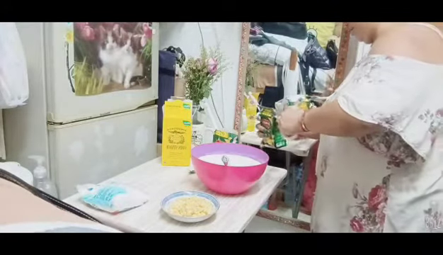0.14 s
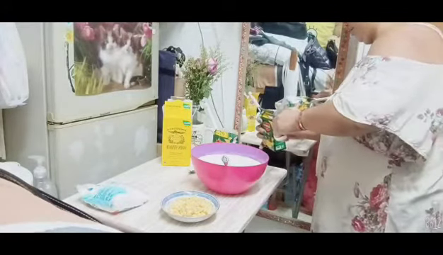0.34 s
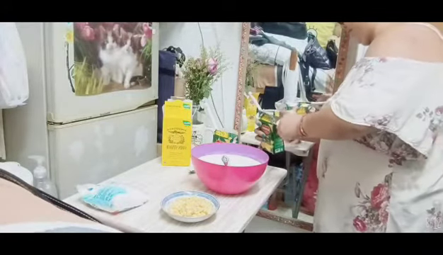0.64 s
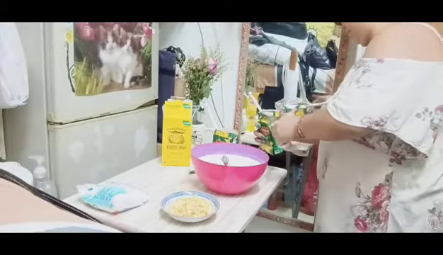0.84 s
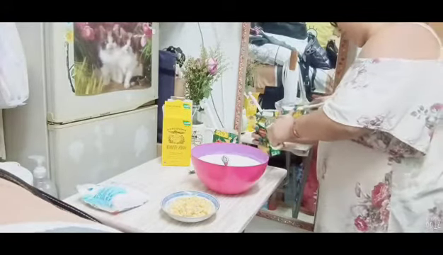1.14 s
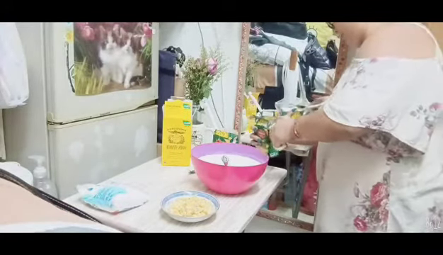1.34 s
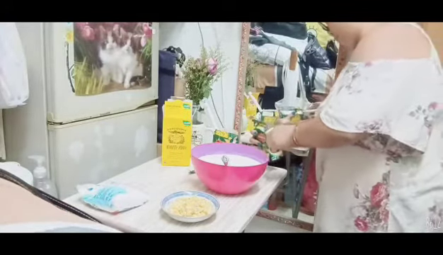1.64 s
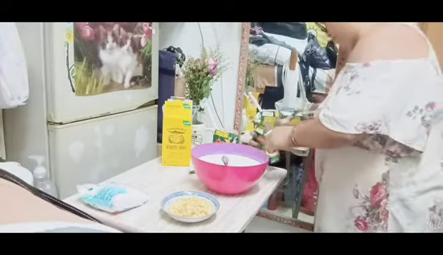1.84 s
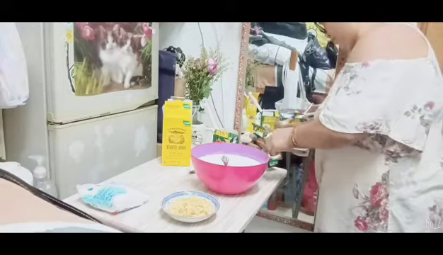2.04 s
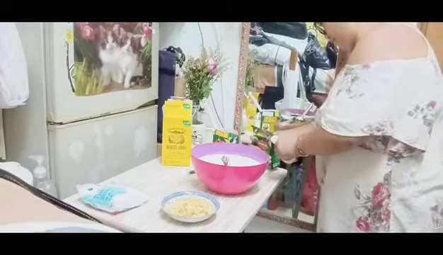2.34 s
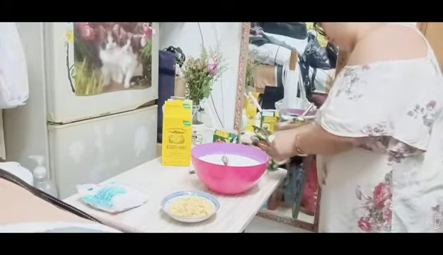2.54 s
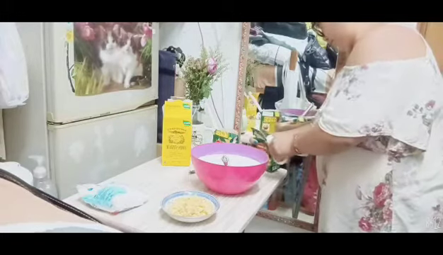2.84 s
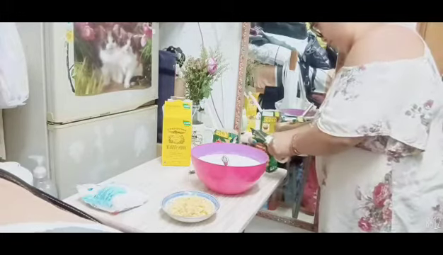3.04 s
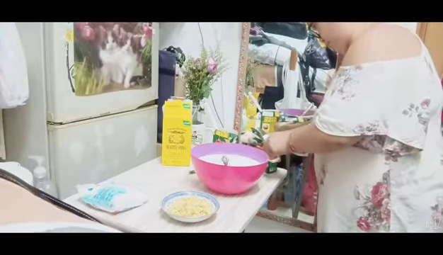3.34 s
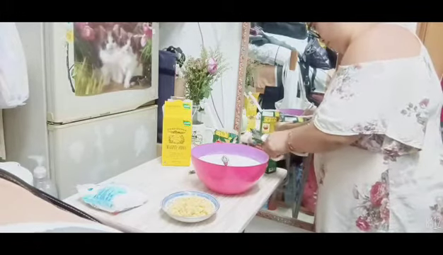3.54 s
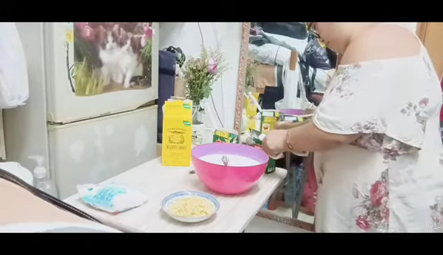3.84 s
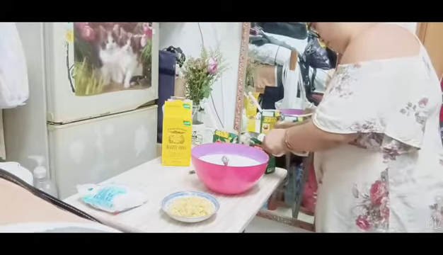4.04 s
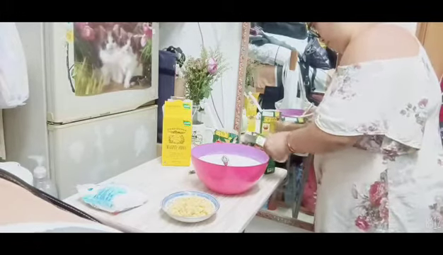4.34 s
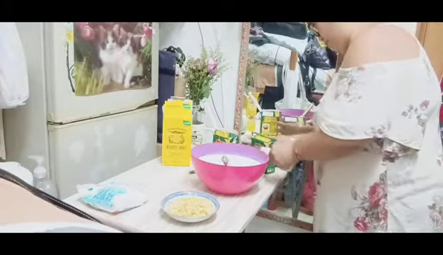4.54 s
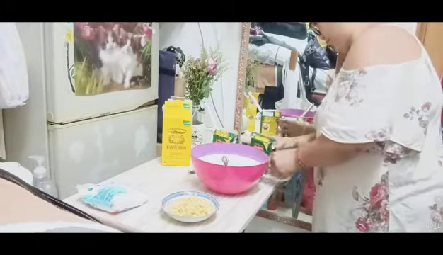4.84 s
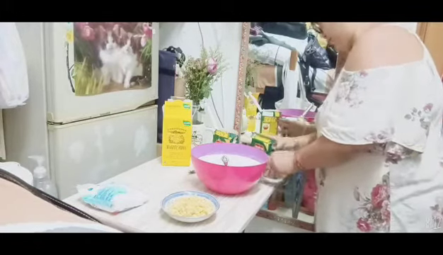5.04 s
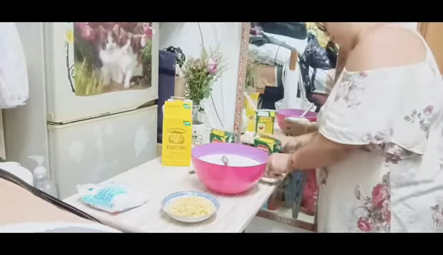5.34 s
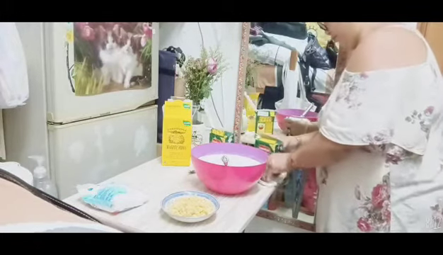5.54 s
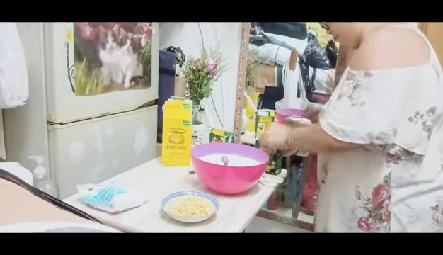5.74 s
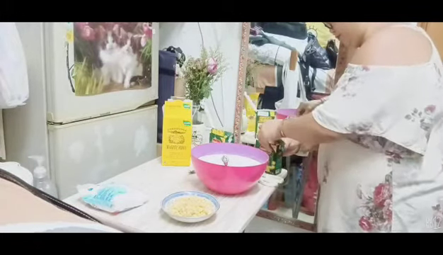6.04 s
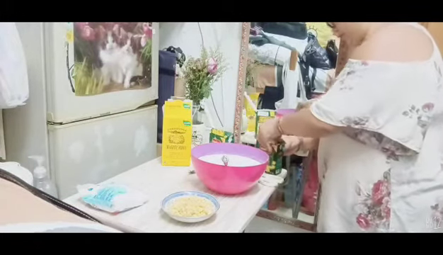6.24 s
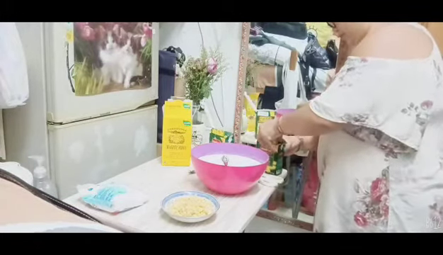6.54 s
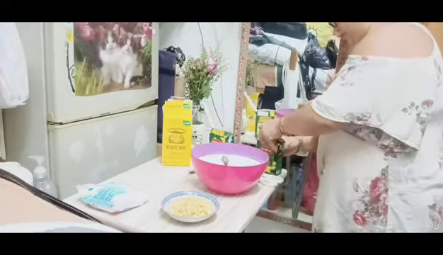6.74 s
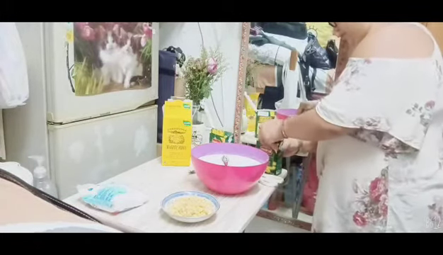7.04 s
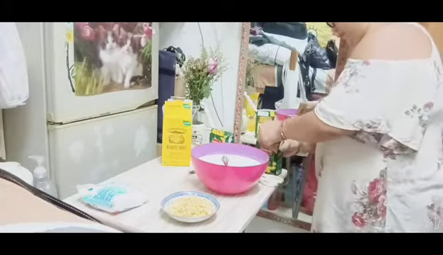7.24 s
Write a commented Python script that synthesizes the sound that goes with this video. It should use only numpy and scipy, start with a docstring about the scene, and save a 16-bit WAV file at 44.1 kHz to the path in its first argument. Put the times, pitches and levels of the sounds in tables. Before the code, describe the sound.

Thin metallic scrapes and ticks on a can rim, one hard bright snap, then tinny clunks on a tabletop, with a steady motor hum in a small kitchen.

```python
"""Two motors a few hertz apart hum and throb over room rush from the start; quiet moments are turned down.
A hand opener then works round a tin can in a small kitchen: the blade scrapes along the rim in short
strokes of filtered friction noise, ticks, squeaks once and slips. One hard snap follows near 3.9 s; the tin
and the tool, built from noise bursts and ringing modes, knock on the table, and metal slides over its top."""
import sys
import numpy as np
from scipy import signal
from scipy.fft import rfft, irfft, next_fast_len
from scipy.io import wavfile
from scipy.ndimage import map_coordinates

SR = 44100
rng = np.random.default_rng(int(sys.argv[2]) if len(sys.argv) > 2 else 0)


def materialize(psi):
    """Save the field psi as 16-bit PCM at rate SR to the path in sys.argv[1].

    A 1-D psi becomes a single channel; in a 2-D psi each row is a channel.
    """
    bounded = np.clip(np.atleast_2d(psi).T, -1, 1)
    quanta = np.round(bounded * 32767).astype(np.int16)
    wavfile.write(sys.argv[1], SR, quanta)


N = 326597


def amp(db):
    """Decibels to gain."""
    return 10 ** (np.asarray(db) / 20)


def unit(x):
    """Scale to rms 1."""
    return x / np.sqrt(np.mean(x ** 2) + 1e-20)


def onset_unit(sound):
    """Scale to rms 1 over the first 10 ms."""
    return sound / np.sqrt(np.mean(sound[:SR // 100] ** 2))


def wobble(rate_hz):
    """A smooth random curve through rate_hz random knots a second."""
    knots = rng.standard_normal(int(N * rate_hz / SR) + 4)
    return map_coordinates(knots, [np.arange(N) * rate_hz / SR])


def colour(x, shape, size=4096):
    """Pass x through a causal minimum-phase filter with the given (pitch_hz, gain_db) shape."""
    knots_hz, gain_db = np.transpose(shape)
    bins_hz = np.fft.rfftfreq(size, 1 / SR)
    log_gain = np.log(amp(np.interp(np.log(bins_hz + 1), np.log(knots_hz), gain_db)))
    # folding the cepstrum onto positive time makes the filter causal
    cepstrum = irfft(log_gain)
    cepstrum[1:size // 2] *= 2
    cepstrum[size // 2 + 1:] = 0
    impulse = irfft(np.exp(rfft(cepstrum)))
    return signal.fftconvolve(x, impulse)[:len(x)]


def add(track, start_s, sound):
    """Mix a sound into the track at its start time."""
    part = track[round(start_s * SR):]
    part[:len(sound)] += sound[:len(part)]


# motor lines, before the shared lift and wobble: pitch_hz [Hz], level_db [dB]
HUM = [(48.02, -68), (100, -65), (144.07, -53.5), (147.95, -57.3), (192.09, -65.5), (196.1, -77)]
# slow rise and fall of the background: time_s [s], gain_db [dB]
SWELL = [(0, 0), (0.8, 1.5), (0.9, -1), (1.9, -1), (2.15, 1.5), (2.87, 3.5), (2.96, -3.5), (3.28, -1.7),
         (3.45, 2.5), (4.13, 1.7), (4.26, -1), (4.7, -2.2), (4.85, 2), (5.93, 1), (6.08, -3.5), (6.8, -4),
         (7.08, 1), (7.41, -1.5)]
# relative colour of the room's low rush: pitch_hz [Hz], gain_db [dB]
AIR = [(25, -26), (45, -6), (65, -5.5), (100, 5), (125, -0.5), (140, 14.5), (175, 1.5), (230, 2), (420, 4),
       (520, -6.5), (850, -12), (1050, -17.5), (1800, -27.5)]
# relative colour of its high fizz: pitch_hz [Hz], gain_db [dB]
FIZZ = [(700, -17.5), (1700, 0), (2300, 4.5), (3100, -9), (3900, -7), (4500, -10.5), (5100, -5),
        (5700, -16), (7200, -6.5), (8600, 2.5), (10000, -4), (11500, -19.5), (15500, -21.5)]
IN_STEP_S = .75  # a moment when the two motors are in step


def background():
    """Two motors drift in and out of step over the rush of the room; the level slowly rises and falls."""
    t = np.arange(N) / SR
    swell_db = np.interp(t, *np.transpose(SWELL))
    t = t - IN_STEP_S
    motors = sum(amp(level_db) * np.cos(2 * np.pi * hz * t) for hz, level_db in HUM)
    hum = amp(1.85 + .3 * wobble(10)) * motors
    air = amp(-59.0) * unit(colour(rng.standard_normal(N), AIR))
    fizz = amp(-68.5 + .5 * wobble(14)) * unit(colour(rng.standard_normal(N), FIZZ))
    # two faint, wavering whines ride on the rush; the higher one does not follow the swell
    whine = amp(-76.5 + 2 * wobble(7)) * np.sin(2 * np.pi * 865 * t + 1.1 * wobble(25))
    sing = amp(-83 + wobble(3)) * np.sin(2 * np.pi * 4420 * t + 2 * wobble(260))
    return amp(swell_db) * (hum + air + fizz + whine) + sing


BITE_S = 0.0075  # time constant of every onset of a push


def push(start_s, length_s, grows_db, release_db_per_s):
    """Gain of one push of the hand: it bites, changes by grows_db toward a gain of 1, then lets go."""
    t = np.maximum(np.arange(N) / SR - start_s, 0)
    pressure_db = grows_db * (np.minimum(t / length_s, 1) - 1)
    release_db = release_db_per_s * np.maximum(t - length_s, 0)
    return (1 - np.exp(-t / BITE_S)) * amp(pressure_db - release_db)


def slips(rate_hz, spread_db, smooth):
    """Strength of friction, rms 1: tiny slips of uneven size over smooth sliding."""
    t = np.arange(SR // 50) / SR
    chance, size = rng.random(N), rng.random(N)
    impulses = (chance < rate_hz / SR) * amp(spread_db * size) ** 2
    energy = signal.fftconvolve(impulses, np.exp(-t / 0.0081))[:N]
    return unit(np.sqrt(np.abs(energy) / np.mean(energy) + smooth))


def friction(grit, shape, patchy_db):
    """Rubbing noise of rms 1; its resonances come and go as the contact moves from spot to spot."""
    spectrum = signal.stft(colour(grit * rng.standard_normal(N), shape), nperseg=512)[2]
    # random gains, smoothed over neighbouring pitches and moments
    patch = np.outer(np.hanning(5), np.hanning(13))
    field = unit(signal.fftconvolve(rng.standard_normal(spectrum.shape), patch, "same"))
    return unit(signal.istft(spectrum * amp(patchy_db * field), nperseg=512)[1][:N])


# strokes of the blade along the rim: start_s [s], push_s [s], hiss_db [dB], rasp_db [dB]
STROKES = [(.045, 0.08, -49.5, -71), (0.32, 0.011, -49, -58.5), (0.344, 0.1, -47.5, -54.5),
           (.65, 0.077, -55, -63.5), (1.46, 0.11, -64.5, -69.5), (1.669, 0.031, -57.5, -57.5),
           (2.05, 0.12, -52.5, -54.5), (2.2, 0.03, -58, -69.5), (2.389, 0.047, -50, -61),
           (2.429, 0.042, -50, -51), (2.596, 0.046, -50, -66), (2.695, 0.027, -54, -61),
           (2.765, 0.057, -49.5, -58), (3.13, 0.1, -55, -67), (3.34, 0.04, -53, -64),
           (3.406, 0.067, -45, -52.5), (3.651, 0.074, -55, -69)]
# relative colour of the blade sliding on the rim: pitch_hz [Hz], gain_db [dB]
HISS = [(2500, -32.5), (3800, -14), (5800, -14.5), (7300, -8.5), (8150, -1.5), (9150, 1), (10200, -8),
        (11200, -11), (11800, -18.5), (15500, -18)]
# relative colour of the rasping wall: pitch_hz [Hz], gain_db [dB]
RASP = [(250, -5), (550, 2.5), (780, 4.5), (1200, 4.5), (1500, -6.5), (1900, -4), (3100, -7.5), (3800, -6),
        (4600, -20.5), (7000, -6), (12000, -14), (15500, -15)]
# growth during each push, and the rate of letting go
HISS_GROWS_DB, HISS_RELEASE_DB_PER_S = 10.5, 261
RASP_GROWS_DB, RASP_RELEASE_DB_PER_S = 5.5, 390


def scraping():
    """The blade drags along the rim in uneven friction and also sets the wall rasping."""
    hiss, rasp = np.zeros(N), np.zeros(N)
    for start_s, push_s, hiss_db, rasp_db in STROKES:
        hiss += amp(hiss_db) * push(start_s, push_s, HISS_GROWS_DB, HISS_RELEASE_DB_PER_S)
        rasp += amp(rasp_db) * push(start_s, push_s, RASP_GROWS_DB, RASP_RELEASE_DB_PER_S)
    grit = slips(rate_hz=310, spread_db=10.5, smooth=0.76)
    return hiss * friction(grit, HISS, patchy_db=2.5) + rasp * friction(grit, RASP, patchy_db=4.0)


def taps(rows, t60_s, attack_s, skirt_db):
    """Light contacts wake only one broad resonance; skirt_db is its gain an octave away."""
    out, t = np.zeros(N), np.arange(SR // 4) / SR
    fade = (1 - np.exp(-t / attack_s)) * amp(-60 * t / t60_s)
    for start_s, level_db, hz in rows:
        peak = [(hz / 2, skirt_db), (hz * .85, skirt_db / 3), (hz, 0),
                (hz * 1.2, skirt_db / 3), (hz * 2, skirt_db), (hz * 4, 2 * skirt_db)]
        burst = colour(fade * rng.standard_normal(len(t)), peak)
        add(out, start_s, amp(level_db) * onset_unit(burst))
    return out


# light ticks of the blade tip, before the shared trim: start_s [s], level_db [dB], pitch_hz [Hz]
TICKS = [(.06, -52, 8900), (1.197, -59, 8200), (1.298, -66, 8400), (1.551, -55.5, 9250),
         (1.941, -57.5, 8300), (2.658, -47.5, 8950), (2.7, -50, 9350), (3.339, -50.5, 9300),
         (3.769, -46.5, 8600), (3.911, -30, 8600), (4.071, -50, 9200), (4.974, -66, 7040),
         (5.086, -61, 8860), (5.135, -57, 8100), (5.2, -67, 6800), (5.337, -59, 7360), (5.619, -49.5, 9200),
         (5.689, -55.5, 7450), (5.747, -60, 8800), (6.796, -54, 9140)]


def ticks():
    """The blade tip ticks: short noise bursts through one high, narrow resonance each."""
    return amp(-1.0) * taps(TICKS, t60_s=.06, attack_s=0.00046, skirt_db=-39.0)


# partials of the squeak: multiple [times the pitch], level_db [dB]
SQUEAK = [(1, -56.5), (2, -54), (3, -68), (4, -45.5)]
SQUEAK_S, SQUEAK_RISE_S = 0.332, 0.0057  # start, and time from there to the peak
SQUEAK_HZ, SQUEAK_JITTER = 2000, 0.014  # pitch, and its scatter as a share


def squeak():
    """For a moment the blade sticks and slips at a nearly regular rate."""
    u = np.maximum(np.arange(N) / SR - SQUEAK_S, 0) / SQUEAK_RISE_S
    pitch_hz = SQUEAK_HZ * (1 + SQUEAK_JITTER * wobble(900))
    phase = 2 * np.pi * np.cumsum(pitch_hz) / SR
    partials = sum(amp(level_db) * np.sin(multiple * phase) for multiple, level_db in SQUEAK)
    return u * np.exp(1 - u) * partials


def speckle(shape, depth_db, count=160):
    """The shape with random peaks and dips: each spot of the tin has its own resonances."""
    hz = np.geomspace(100, SR / 2, count)
    knots_hz, gain_db = np.transpose(shape)
    smooth_db = np.interp(np.log(hz), np.log(knots_hz), gain_db)
    return np.transpose([hz, smooth_db + depth_db * rng.standard_normal(count)])


# modes of the tin: pitch_hz [Hz], strength_db [dB, before shape and scatter], t60_s [s]
TIN = [(315, -6, .18), (387, 2, .26), (455, -4, .17), (581, 0, .26), (795, 2, .2), (875, -2, .16),
       (1506, -8, .16), (1610, -6, .22), (1765, -3, .2), (1854, 3, .22), (1955, -4, .14), (2105, -3, .13),
       (2340, -2, .12), (2580, -1, .12), (3370, -1, .18), (3620, -2, .15), (4160, -4, .12), (5000, -4, .12),
       (6145, -1, .13), (6720, -1, .1), (8052, 1, .11), (8180, 2, .1), (8285, 2, .1), (8553, 0, .11),
       (8883, -1, .11), (9060, -1, .11), (9277, -1, .1)]


def strike(shape, crack_db, t60_s, ring_db):
    """One part after a blow: a crack, a dense rattle and those modes of the tin its colour lets through."""
    t = np.arange(SR // 3) / SR
    fade = amp(crack_db - 60 * t / 0.0043) + amp(-60 * t / t60_s)
    rattle = unit(colour(fade * rng.standard_normal(len(t)), speckle(shape, depth_db=4.0)))
    # one row per mode
    hz, strength_db, mode_t60_s = np.transpose(TIN)[:, :, None]
    reach_db = np.interp(hz, *np.transpose(shape), left=-80, right=-80)
    scatter_db = 2 * rng.standard_normal(hz.shape)
    sizes = amp(strength_db + reach_db + scatter_db) * rng.choice([-1, 1], hz.shape)
    decays = np.exp(-np.log(1000) * t / mode_t60_s)
    ring = unit(np.sum(sizes * decays * np.sin(2 * np.pi * hz * t), axis=0))
    return onset_unit(rattle + amp(ring_db) * ring)


# the blade catches and slips while cutting, before the rim's trim: start_s [s], rim_db [dB]
SLIPS = [(0.417, -52), (.441, -51), (2.051, -54.5), (2.076, -58), (2.1, -52), (2.125, -52.5), (2.157, -43),
         (2.193, -46), (2.716, -46), (2.839, -43), (3.438, -49), (3.455, -36.5), (3.504, -43.5),
         (3.851, -39.5)]
# snaps and clanks of opener and tin, before each part's trim and stretch of the rattle:
# start_s [s], rim_db [dB], blade_db [dB], wall_db [dB], bottom_db [dB], rattle_t60_s [s]
CONTACTS = [(0.7205, -45, -45, -57, -54.5, 0.041), (3.915, -18, -27, -41, -63, 0.027),
            (3.921, -19.5, -32, -49, -80, 0.052), (4.006, -47, -71, -50, -60, 0.052),
            (4.047, -41, -49.5, -36, -54, 0.085), (4.151, -58, -57.5, -48, -72, 0.077),
            (4.190, -68.5, -68, -61, -75, 0.07), (4.7425, -32, -38.5, -39.5, -36.5, 0.062),
            (5.402, -62, -50, -43, -49, 0.06), (5.441, -35.5, -35, -26.5, -39.5, 0.049),
            (5.46, -68, -64, -40, -40, 0.18), (5.478, -54, -64, -40.5, -42, 0.12),
            (5.506, -65, -56, -42, -42.5, 0.072)]
# relative colour of the bright rim: pitch_hz [Hz], gain_db [dB]
RIM = [(3000, -45), (6000, -23), (7400, -12), (8150, -4), (8800, -3), (9300, 1.5), (9900, -13),
       (11700, -22), (15500, -22.5)]
# relative colour of the struck blade: pitch_hz [Hz], gain_db [dB]
BLADE = [(1900, -31), (2600, -3.5), (3100, -17), (3700, -2), (4300, -1), (4900, -2), (5500, 1.5),
         (7500, 1.5), (10500, -5.5), (12500, -13), (15500, -20.5)]
# relative colour of the tin's wall: pitch_hz [Hz], gain_db [dB]
WALL = [(900, -24.5), (1200, -17), (1480, 0.5), (1850, -1), (2450, -0.5), (2950, -12), (3400, -5),
        (4400, -10), (8000, -34)]
# relative colour of the tin's bottom: pitch_hz [Hz], gain_db [dB]
BOTTOM = [(150, -36.5), (240, -20), (310, 3), (400, 3.5), (580, 5), (850, -5), (1200, -10.5), (1700, -27.5)]
# every slip shares these levels against rim_db, and one rattle, before the same trims and stretch
SLIP_BLADE_DB, SLIP_WALL_DB, SLIP_BOTTOM_DB, SLIP_T60_S = -14, -12.5, -12.5, 0.037


def contacts():
    """Each slip or clank shakes the bright rim, the blade, the wall and the bottom by its own amounts."""
    out = np.zeros(N)
    slipping = [(start_s, rim_db, rim_db + SLIP_BLADE_DB, rim_db + SLIP_WALL_DB,
                 rim_db + SLIP_BOTTOM_DB, SLIP_T60_S) for start_s, rim_db in SLIPS]
    for start_s, rim_db, blade_db, wall_db, bottom_db, t60_s in slipping + list(CONTACTS):
        rim = strike(RIM, crack_db=-3, t60_s=1.8 * t60_s, ring_db=-5.0)
        blade = strike(BLADE, crack_db=-0.5, t60_s=1.9 * t60_s, ring_db=-10.5)
        wall = strike(WALL, crack_db=-2, t60_s=1.37 * t60_s, ring_db=-9)
        bottom = strike(BOTTOM, crack_db=-7, t60_s=1.1 * t60_s, ring_db=-4)
        add(out, start_s, amp(rim_db - 1.1) * rim)
        add(out, start_s, amp(blade_db) * blade)
        add(out, start_s, amp(wall_db - 3.5) * wall)
        add(out, start_s, amp(bottom_db - 2.0) * bottom)
    return out


# dull knocks of the tin in the hand and on the table, before the shared lift:
# start_s [s], level_db [dB], pitch_hz [Hz]
KNOCKS = [(1.695, -66, 1030), (3.909, -50, 1010), (3.945, -74, 950), (3.976, -44.5, 798), (4.973, -55, 830),
          (5.307, -44, 504), (5.404, -49, 550), (5.460, -37, 383.4), (5.484, -46.5, 705),
          (6.214, -65, 1178)]


def knocks():
    """The tin knocks dully: soft-edged noise bursts through one low, broad resonance each."""
    return amp(1.0) * taps(KNOCKS, t60_s=.07, attack_s=.001, skirt_db=-20)


# relative colour of metal sliding on the table top: pitch_hz [Hz], gain_db [dB]
TABLE = [(250, -11), (500, 16.5), (1100, -6), (1850, 4), (3300, -11), (4700, -9), (5400, 0), (6800, -4),
         (8200, 3), (9600, 1), (10300, -7), (15500, -23)]
# one fading move; SLIDE_DB is its level at the start, before the bite
SLIDE_START_S, SLIDE_LENGTH_S, SLIDE_DB = 4.755, 0.5, -60
SLIDE_FADE_DB_PER_S, SLIDE_RELEASE_DB_PER_S = 4.5, 150


def sliding():
    """Metal shifts over the table top in small uneven rubs."""
    fade_db = SLIDE_FADE_DB_PER_S * SLIDE_LENGTH_S
    move = push(SLIDE_START_S, SLIDE_LENGTH_S, -fade_db, SLIDE_RELEASE_DB_PER_S)
    grit = slips(rate_hz=160, spread_db=16, smooth=0.7)
    return amp(SLIDE_DB - fade_db) * move * friction(grit, TABLE, patchy_db=4.0)


def kitchen(x, t60_s, wet_db):
    """Close walls add a short, dense tail."""
    t = np.arange(SR // 2) / SR
    tail = rng.standard_normal(len(t)) * amp(-60 * t / t60_s) * (1 - np.exp(-t / 0.0021))
    tail = colour(tail, [(100, 2.5), (3000, 3.0), (8000, -4.5), (15000, -7.0)])
    return x + amp(wet_db) * signal.fftconvolve(x, tail / np.linalg.norm(tail))[:N]


# threshold, dB lost per dB below it, and reaction time
EXPAND_BELOW_DB, EXPAND_SLOPE, EXPAND_S = -47, 0.29, 0.017


def expander(x):
    """The gain sinks as the smoothed power of the sound falls below the threshold."""
    keep = np.exp(-1 / (EXPAND_S * SR))
    start_power = np.mean(x[:, :SR // 20] ** 2)
    power = signal.lfilter([1 - keep], [1, -keep], x ** 2, zi=[[start_power]])[0]
    below_db = np.minimum(10 * np.log10(power) - EXPAND_BELOW_DB, 0)
    return x * amp(EXPAND_SLOPE * below_db)


def scene():
    """Opener and tin sound in the kitchen over the background, mixed to one channel."""
    work = scraping() + ticks() + squeak() + contacts() + knocks() + sliding()
    return (kitchen(work, t60_s=0.15, wet_db=-13.5) + background())[None]


TOP_HZ = 15550  # band limit


def record(dry):
    """Quiet moments are turned down, and a very steep low-pass removes what lies above the band limit."""
    size = next_fast_len(N + SR // 2)
    gain = 1 / (1 + (np.fft.rfftfreq(size, 1 / SR) / TOP_HZ) ** 200)
    return irfft(rfft(expander(dry), size) * gain, size)[:, :N]


dry = scene()
out = record(dry)
materialize(out)
```